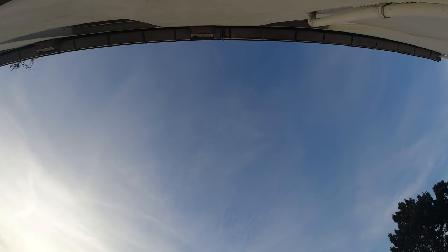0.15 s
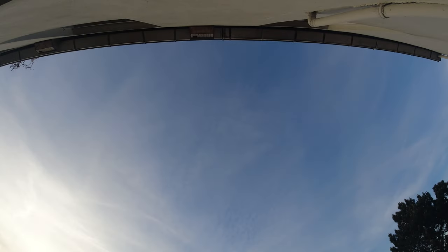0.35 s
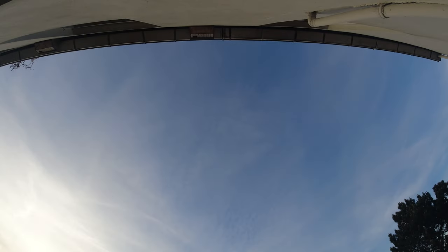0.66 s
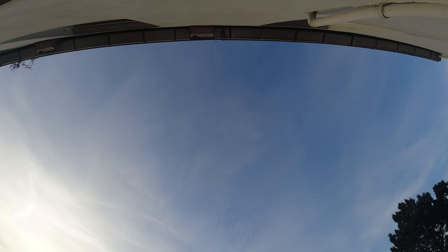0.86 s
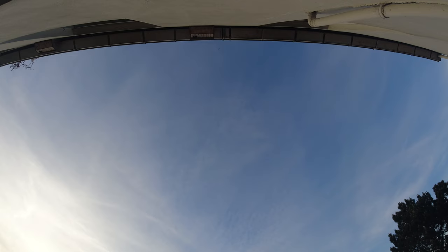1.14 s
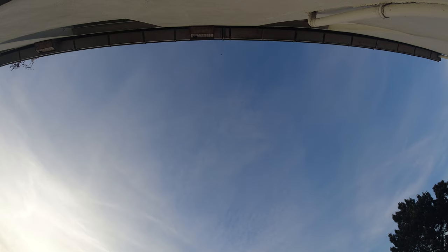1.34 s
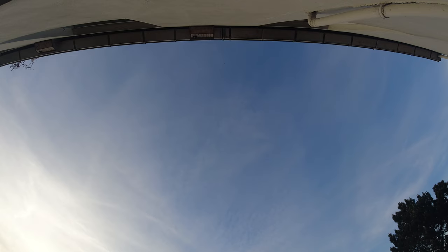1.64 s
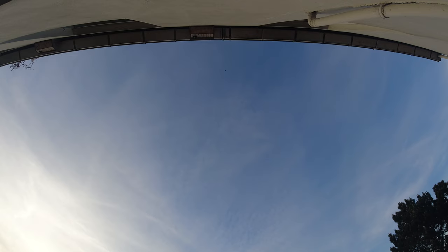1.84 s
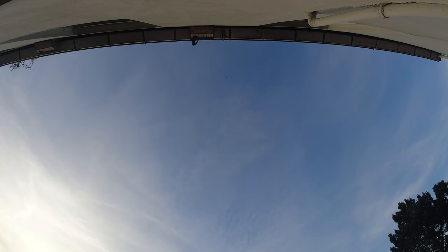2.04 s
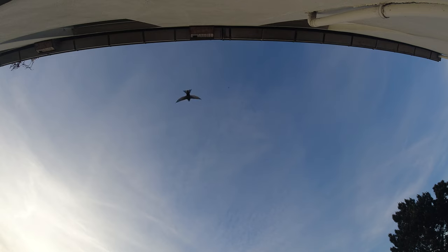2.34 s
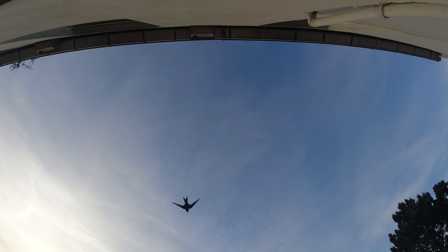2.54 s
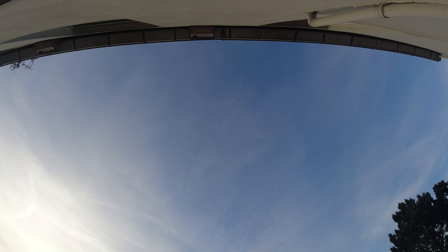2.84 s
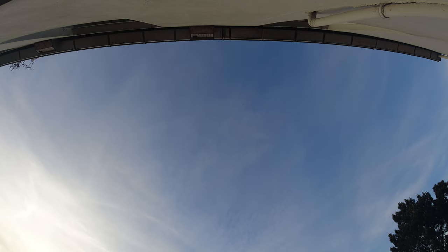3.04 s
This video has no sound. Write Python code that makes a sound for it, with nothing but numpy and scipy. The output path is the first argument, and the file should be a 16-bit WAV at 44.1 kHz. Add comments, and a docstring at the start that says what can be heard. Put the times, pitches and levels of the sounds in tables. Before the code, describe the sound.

A songbird gives short sliding whistles and buzzy trills, rough sparrow chirps between, thin falling peeps from further off; a bird passes with soft wing beats near the end, outdoors under eaves, stereo microphone, faint traffic.

```python
"""A songbird whistles glides and trills at evening under the eaves: jittering sines on drawn pitch contours.
Sparrows chirp, rough with breath noise; thin falling notes and faint high peeps come from further off.
Walls and trees return a diffuse, decaying noise echo; two close microphone ports hear each bird a
little apart in time. Filtered noise and wavering sines make the air and distant traffic, and
short bursts of band noise the dull gusts, tiny ticks and soft wing beats."""
import sys
import numpy as np
from scipy import signal
from scipy.fft import rfft, irfft, next_fast_len
from scipy.io import wavfile
from scipy.ndimage import uniform_filter1d

SR = 44100
rng = np.random.default_rng(int(sys.argv[2]) if len(sys.argv) > 2 else 0)


def volts_from_decibels(level):
    """Turn decibel levels (scalar or array-like) into linear amplitude factors."""
    exponent = np.asarray(level, float) / 20
    return 10 ** exponent


def output_pcm(signal):
    """Save a mono or channel-first signal as 16-bit PCM at the path in sys.argv[1].

    Samples are clipped to [-1, 1] before scaling.
    """
    pcm = np.clip(np.atleast_2d(signal).T, -1, 1) * 32767
    wavfile.write(sys.argv[1], SR, np.round(pcm).astype(np.int16))


N = 140679  # length in samples
RUN_IN_S = .1  # bird tracks start this long before the scene

# voice and surroundings of each kind of bird, keyed by kind:
# [echo energy re direct sound/dB, pitch jitter/Hz, share of breathy rasp/1, second harmonic re first/dB]
VOICES = {"whistle": (-5, 17, .04, -55), "trill": (-8, 70, .25, -34), "chirp": (-2, 150, .75, -40),
          "thin": (-3, 18, .04, -60)}


def rms_one(x):
    """Normalization: equal mean power, whatever the input."""
    return x / np.sqrt(np.mean(x ** 2) + 1e-20)


def at_hz(points, hz):
    """Linear interpolation on a logarithmic frequency axis."""
    table_hz, values = np.transpose(points)
    return np.interp(np.log(hz), np.log(table_hz), values)


def drift(rate_hz):
    """Low-pass noise: two equal real poles leave a slow random fluctuation of unit rms."""
    r = np.exp(-2 * np.pi * rate_hz / SR)
    white = rng.standard_normal(N + SR)
    slow = signal.lfilter([1], [1, -2 * r, r * r], white)
    return rms_one(slow[SR:])  # the first second lets the filter settle


def silence():
    """Superposition starts from zero pressure, a little before the scene."""
    return np.zeros(N + int(RUN_IN_S * SR))


def contour(rows):
    """Piecewise-linear modulation: start, time, pitch with rounded corners, and level along a note."""
    s, hz, db = np.transpose(rows)
    t = np.arange(s[0], s[-1], 1 / SR)
    pitch = uniform_filter1d(np.interp(t, s, hz), size=130, mode="nearest")
    return s[0], t - s[0], pitch, np.interp(t, s, db)


def throb_db(t, rate_hz, share):
    """Amplitude modulation: a raised cosine pulses the given share of the amplitude."""
    return 20 * np.log10(1 - share * np.cos(2 * np.pi * rate_hz * t))


def add_note(out, start_s, pitch, level_db, kind, blur_hz=0):
    """Frequency modulation by noise: a jittering sine and weak octave, partly broken up by breath noise."""
    jitter_band_hz, rasp_band_hz, edge_s = 252.1, 550, .003
    _, jitter_hz, rasp, overtone_db = VOICES[kind]
    t = np.arange(len(pitch)) / SR
    edge = np.sin(np.pi / 2 * np.clip(np.minimum(t, t[-1] - t) / edge_s, 0, 1)) ** 2
    # random values two per cycle of the band limit, joined by straight lines
    jitter = np.interp(t * jitter_band_hz * 2, np.arange(999), rng.standard_normal(999))
    breath = np.interp(t * rasp_band_hz * 2, np.arange(999), rng.standard_normal(999))
    phase = 2 * np.pi * np.cumsum(pitch + (jitter_hz + blur_hz) * jitter) / SR
    tone = np.sin(phase) + volts_from_decibels(overtone_db) * np.sin(2 * phase)
    roughness = np.sqrt(1 - rasp ** 2) + rasp * breath
    note = np.sqrt(2) * volts_from_decibels(level_db) * edge * roughness * tone
    i = int((start_s + RUN_IN_S) * SR)
    out[i:i + len(t)] += note[:len(out) - i]


def placed(x, kind):
    """Propagation: wavering direct sound reaches the left port first; a diffuse echo decays in each channel."""
    waver_db, waver_hz, left_leads_ms = 2.5, 41.8, .1
    late_t60_s, early_t60_s, early_db, gap_s = 0.71, 0.16, 7.5, 0.0041
    echo_db = VOICES[kind][0]
    lead = len(x) - N
    x = x * volts_from_decibels(waver_db * np.pad(drift(waver_hz), (lead, 0), "edge"))
    t = np.arange(SR) / SR
    decay = volts_from_decibels(-60 * t / late_t60_s) + volts_from_decibels(early_db - 60 * t / early_t60_s)
    tail = decay * np.clip(t / gap_s - 1, 0, 1)  # silent for one gap, then fades in over another
    echo = rng.standard_normal((2, SR)) * tail / np.sqrt(np.sum(tail ** 2))
    size = next_fast_len(len(x) + SR)
    right = np.exp(-2j * np.pi * np.fft.rfftfreq(size, 1 / SR) * left_leads_ms / 1000)  # pure delay
    direct = np.stack([np.ones_like(right), right])
    paths = direct + volts_from_decibels(echo_db) * rfft(echo, size)
    return irfft(rfft(x, size) * paths, size)[:, lead:lead + N]


def puffs(events, width_s, low_hz, high_hz):
    """Gated noise: Gaussian envelopes open a band of partly shared stereo noise."""
    t = np.arange(N) / SR
    shape = sum(volts_from_decibels(db) * np.exp(-.5 * ((t - s) / width_s) ** 2) for s, db in events)
    mid, side = rng.standard_normal((2, N))
    band = signal.butter(3, [low_hz, high_hz], "band", fs=SR, output="sos")
    return shape * rms_one(signal.sosfilt(band, mid + 0.23 * side * [[1], [-1]]))


def air(patchy_db):
    """Spectral shaping: half-octave noise bands, each with its level, flicker and interchannel correlation."""
    air_db = -56.5  # rms of the whole
    # distant traffic and air: [f/Hz, relative spectral level of the part common to both channels/dB per Hz]
    spectrum = [(20, 6.5), (50, 0.5), (125, -8.5), (500, -21), (1000, -26), (2000, -30), (4000, -36),
                (5500, -38.5), (8000, -48), (10000, -54.5), (13000, -57), (16000, -66)]
    # correlation of left with right: [f/Hz, correlation/1]
    likeness = [(60, 0.96), (300, 0.83), (760, .55), (1420, 0.094), (2680, -0.08), (5050, -0.54),
                (7000, 0.85), (12000, 0.34)]
    out, band_edges = 0, 20 * 2 ** np.arange(0, 9.8, .5)
    white = rng.standard_normal((2, 2, N))
    slow = [drift(10.0), drift(4.9), drift(12.0)]
    for k, (low, high) in enumerate(zip(band_edges, band_edges[1:])):
        band = signal.butter(3, [low, high], "band", fs=SR, output="sos")
        mid, side = signal.sosfilt(band, white[k % 2])
        hz = np.sqrt(low * high)
        alike = at_hz(likeness, hz)
        side_gain = np.sqrt((1 - alike) / (1 + alike))  # side amplitude that gives this correlation
        gain = volts_from_decibels(at_hz(spectrum, hz) + patchy_db * slow[k % 3])
        out = out + gain * (mid + side_gain * side * [[1], [-1]])
    return volts_from_decibels(air_db) * rms_one(out)


def hum():
    """Random modulation: low sines waver in frequency and level."""
    # drones: [mean f/Hz, level about which it wavers/dB]
    drones = [(38, -59), (50, -56), (74, -65), (100, -65)]
    out = 0
    for hz, db in drones:
        level = volts_from_decibels(db + 3.6 * drift(2.0))
        pitch = hz * (1 + 0.0479 * drift(3.2))
        out = out + np.sqrt(2) * level * np.sin(2 * np.pi * np.cumsum(pitch) / SR)
    return out


def chirps():
    """Scaling of one contour: the sparrow's template is stretched and shifted, and throbs quickly."""
    throb_hz, throb_share = 254.6, 0.3
    # two-humped template before scaling: [t after start/s, f/Hz, level re the chirp's own/dB]
    template = [(.008, 4400, -15), (.02, 4150, 0.5), (.03, 4700, -1), (.044, 4800, -2), (.054, 3600, -2.5),
                (0.074, 3250, -9), (0.095, 3400, -1.5), (.16, 3300, -14)]
    # chirps: [start t/s, level/dB, pitch factor/1, length factor/1]
    calls = [(-.032, -48, 1.044, 0.87), (.923, -50, 0.99, 1.11), (1.73, -47, 1.016, 1.1),
             (2.645, -47, 1.038, 1.024)]
    out = silence()
    for start, level_db, higher, longer in calls:
        s, t, hz, db = contour(np.array(template) * [longer, higher, 1])
        add_note(out, start + s, hz, level_db + db + throb_db(t, throb_hz, throb_share), "chirp")
    return out


def whistles():
    """Nearly pure tones: the songbird's glides follow slow frequency contours."""
    # glides, one list each: [t/s, f/Hz, level/dB]
    glides = [
        [(0, 1994, -49), (.03, 2050, -48)],
        [(-.005, 3890, -44.5), (.016, 4004, -44)],
        [(.052, 1950, -53), (.066, 1620, -65.5), (.088, 1580, -64)],
        [(.125, 2460, -48.5), (.165, 2047, -56), (.19, 1940, -70)],
        [(.255, 2800, -67), (.305, 3080, -63), (.335, 2450, -70)],
        [(.485, 2125, -84), (.51, 2198, -61), (.552, 2237, -53.5), (.58, 1720, -60)],
        [(.735, 2400, -66), (.75, 2600, -65)],
        [(.772, 2017, -76), (.79, 1941, -54.5), (.815, 1600, -53.5), (.87, 1459, -61.5), (.96, 1718, -46),
         (1.03, 1738, -69.5)],
        [(1.092, 1865, -58.5), (1.12, 1796, -48.5), (1.23, 2071, -55), (1.28, 2128, -46), (1.30, 2214, -42),
         (1.39, 2313, -38), (1.43, 2347, -46.5)],
        [(1.608, 2770, -42), (1.643, 2400, -45.5)],
        [(1.965, 3970, -45), (2.012, 4040, -49)],
        [(2.022, 3400, -45), (2.092, 3500, -54)],
        [(1.91, 1743, -61), (1.95, 1880, -57.5), (1.99, 2047, -47)],
        [(2.005, 1942, -45.5), (2.03, 1472, -53.5), (2.10, 1434, -47.5)],
        [(2.09, 1986, -50), (2.118, 1480, -44.5)],
        [(2.135, 1870, -54), (2.175, 1580, -49.5)],
        [(2.155, 2912, -48.5), (2.185, 2350, -37.5), (2.222, 2226, -47.5), (2.233, 2250, -71),
         (2.243, 2333, -41), (2.257, 2300, -56), (2.285, 2228, -36.5), (2.318, 2221, -60)],
    ]
    out = silence()
    for rows in glides:
        s, t, hz, db = contour(rows)
        add_note(out, s, hz, db, "whistle")
    return out


def trills():
    """Sawtooth frequency modulation: quick downward sweeps, each loudest in its middle."""
    throb_share = 0.37
    # trilled notes: (sweep rate/Hz, sweep depth/Hz), then a contour of [t/s, f/Hz, level/dB]
    trilled = [ ((138, 1000), [(.01, 2410, -52), (.035, 3257, -39), (.07, 2818, -48.5), (.105, 3330, -46.5),
               (.13, 3130, -56)]), ((83, 360), [(1.525, 7770, -69.5), (1.6, 8030, -68.5),
               (1.66, 7560, -73.5)]), ((75, 430), [(1.525, 2850, -55), (1.57, 2792, -41.5),
               (1.61, 2786, -42.5)]), ((155, 510), [(1.985, 2186, -41.5), (2.01, 2763, -48.5),
               (2.04, 3196, -40), (2.085, 2810, -52.5), (2.11, 3220, -50.5)]), ]
    out = silence()
    for (rate, depth), rows in trilled:
        s, t, hz, db = contour(rows)
        sweep = uniform_filter1d(.5 - (rate * t) % 1, size=40)  # from +1/2 down to -1/2, corners rounded
        add_note(out, s, hz + depth * sweep, db + throb_db(t, rate, throb_share), "trill")
    return out


def thin_notes():
    """Frequency relaxation: pitch drops onto a held tone, quieter and more blurred while it drops."""
    drop_s, sag_db = .009, 4  # time for the excess pitch to fall to a quarter; fading over the note
    swell_db, drop_blur = 16, .06  # level loss per unit relative excess; jitter per Hz of excess
    # notes: [start t/s, length/s, held f/Hz, initial excess above it/Hz, level before swell and sag/dB]
    falling = [(0.022, .015, 7870, 37.04, -70), (1.146, 0.058, 5030, 30.24, -62.5),
               (1.41, 0.12, 8040, 64.7, -80.5), (1.445, 0.06, 4390, 404, -52.5),
               (1.521, 0.017, 3626, 706, -50), (2.004, 0.029, 8020, 38.6, -77),
               (2.085, 0.059, 4236, 1907, -46), (2.406, 0.097, 4523, 1880, -47.5),
               (2.718, 0.058, 3800, 2394, -47), (3.039, .11, 4513, 1980, -52.5)]
    out = silence()
    for start, length, hz, drop, db in falling:
        t = np.arange(0, length, 1 / SR)
        above = drop * (1 + t / drop_s) ** -2
        level_db = db - swell_db * above / hz - sag_db * t / length
        add_note(out, start, hz + above, level_db, "thin", drop_blur * above)
    return out


def thumps():
    """Low band noise under a smooth envelope: dull gusts."""
    # gusts: [centre t/s, level at the centre/dB]
    gusts = [(.09, -83), (.6, -62.5), (.83, -65.5)]
    return puffs(gusts, 0.05, 100, 744)


def ticks():
    """The shorter the burst, the more click-like: tiny bright ticks close by, with no echo."""
    # ticks: [centre t/s, rms level at the centre/dB]
    clicks = [(1.554, -80), (1.8083, -76), (2.1066, -73)]
    return puffs(clicks, 0.00083, 5300, 16000)


def wing_beats():
    """Periodic noise bursts: soft, evenly spaced beats of a passing bird, loudest when nearest."""
    first_s, gap_s, nearest_s, top_db, fade_db_per_s = 2.36, .0815, 2.55, -63, 18
    times = first_s + gap_s * np.arange(8)
    beats = [(s, top_db - fade_db_per_s * abs(s - nearest_s)) for s in times]
    return puffs(beats, 0.021, 500, 3620)


def scene():
    """Superposition: the birds with their echoes, the small close sounds, air and hum add as pressures."""
    birds = placed(chirps(), "chirp") + placed(whistles(), "whistle")
    birds = birds + placed(trills(), "trill") + placed(thin_notes(), "thin")
    small = thumps() + ticks() + wing_beats()
    return birds + small + air(patchy_db=1.5) + hum()


def roll_off(x):
    """The treble ends steeply here."""
    return signal.sosfilt(signal.butter(12, 15700, fs=SR, output="sos"), x)


def record(dry):
    """Linear superposition is complete here: the finished mix goes to the output stage."""
    return roll_off(dry)


dry = scene()
out = record(dry)
output_pcm(out)
```